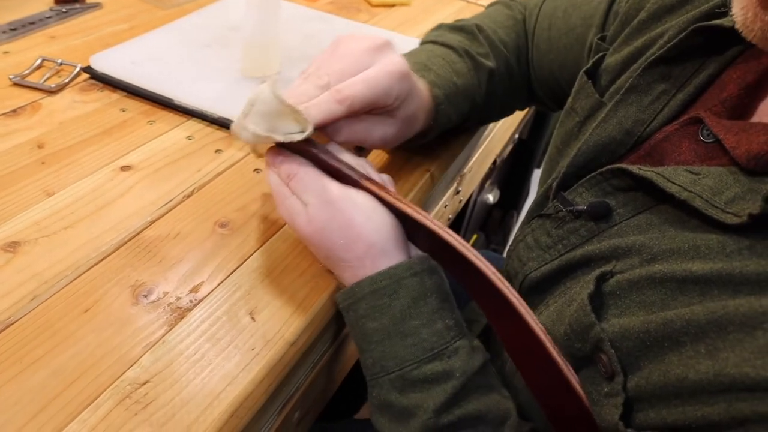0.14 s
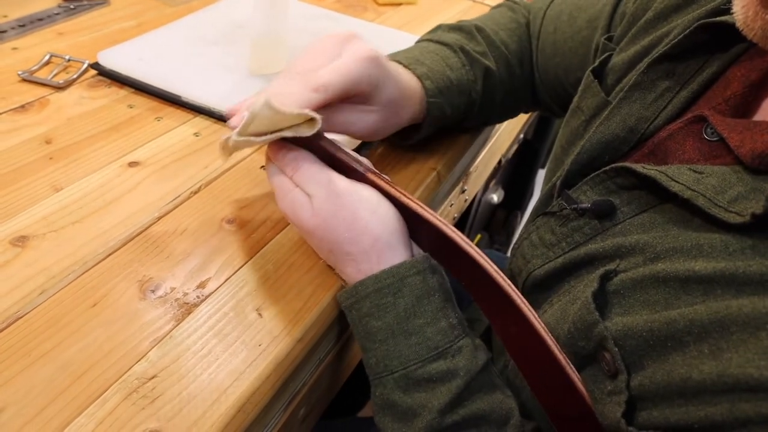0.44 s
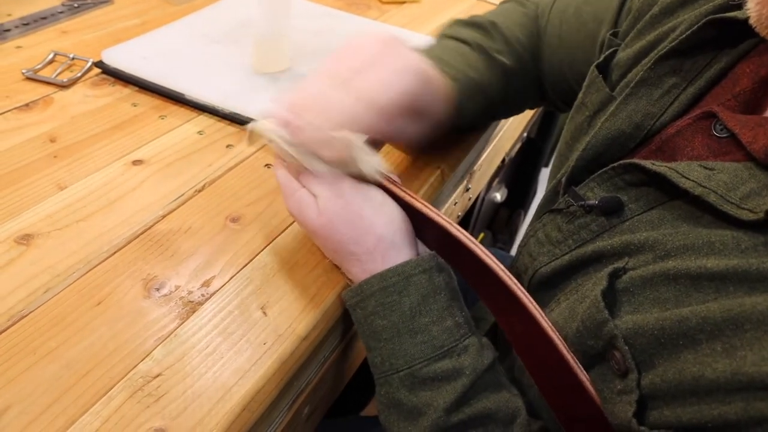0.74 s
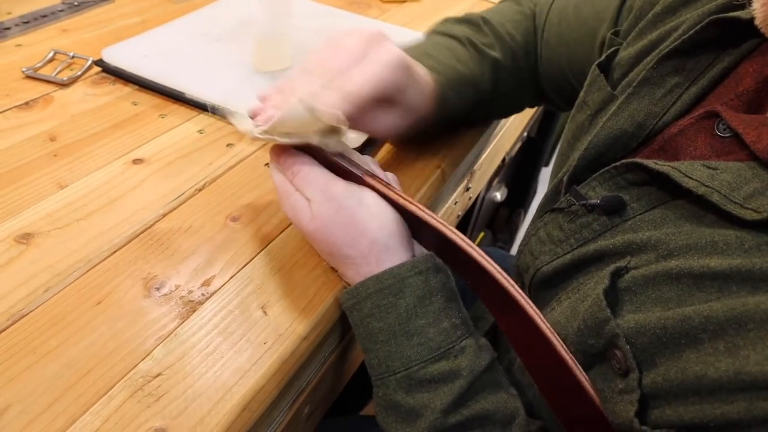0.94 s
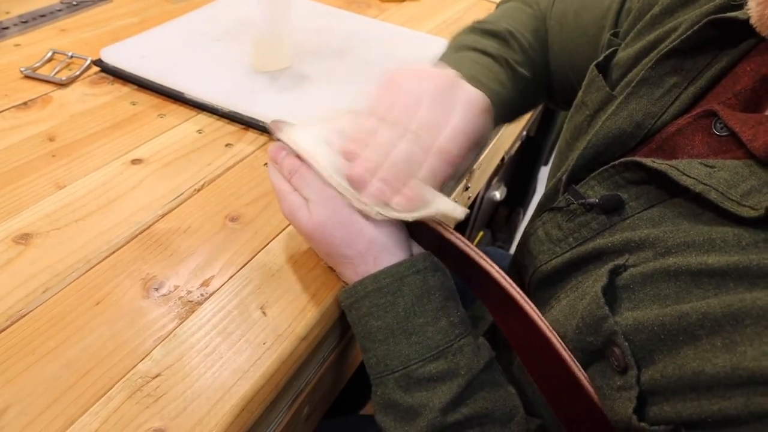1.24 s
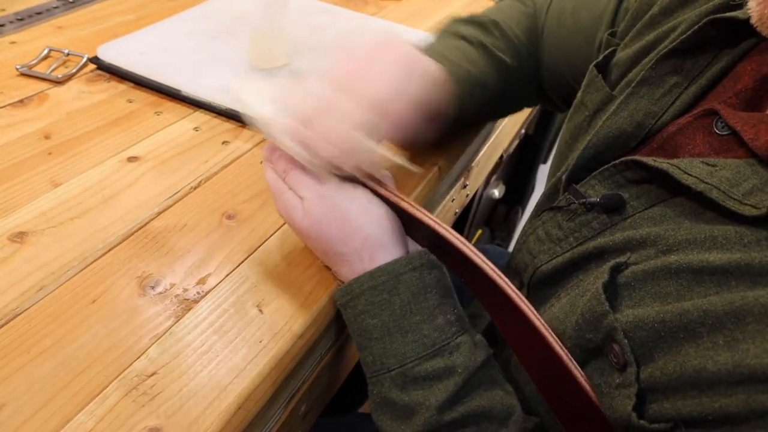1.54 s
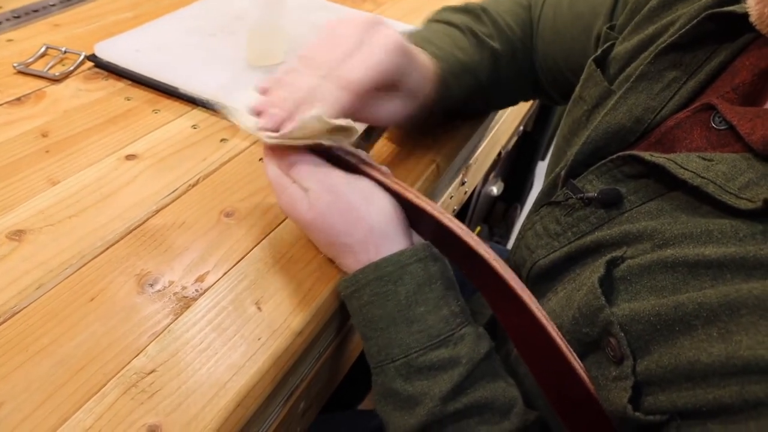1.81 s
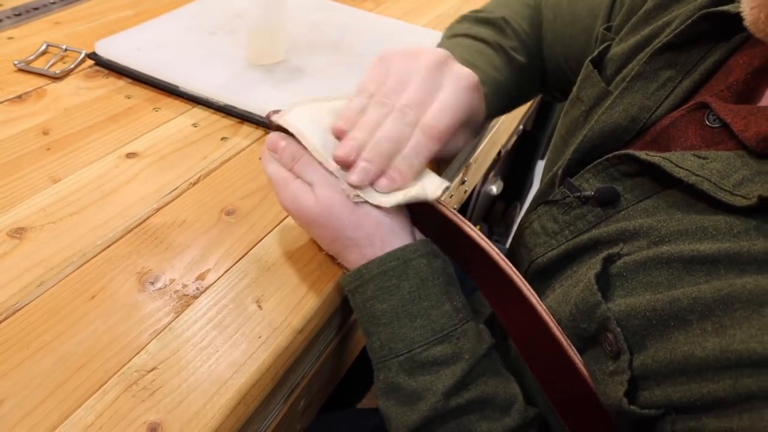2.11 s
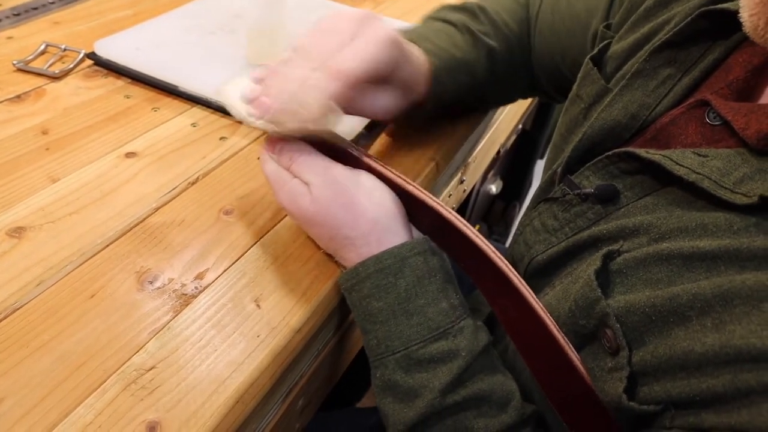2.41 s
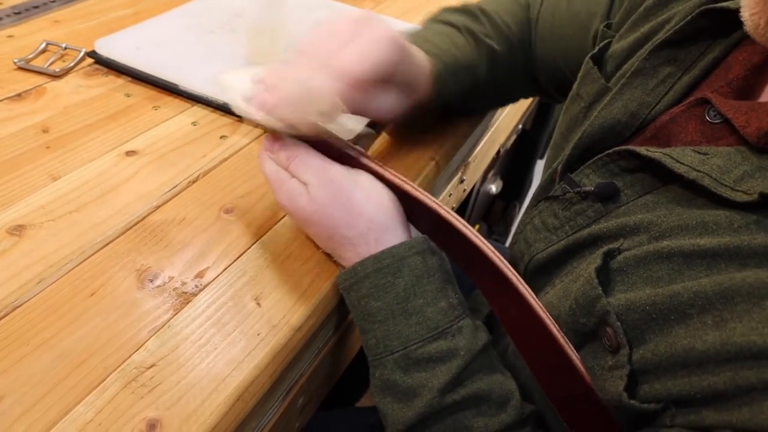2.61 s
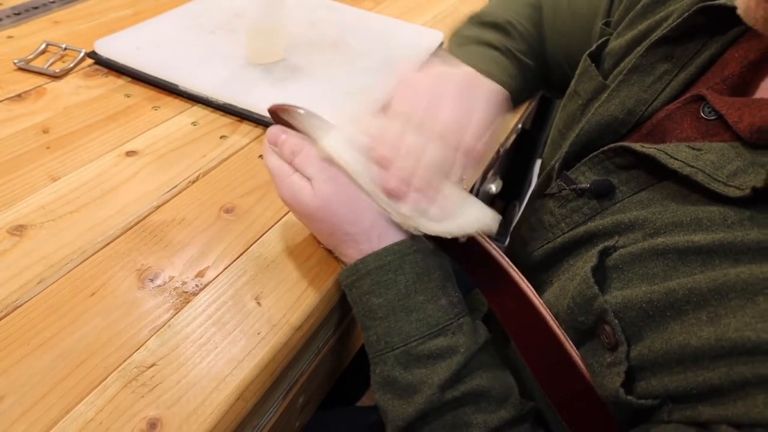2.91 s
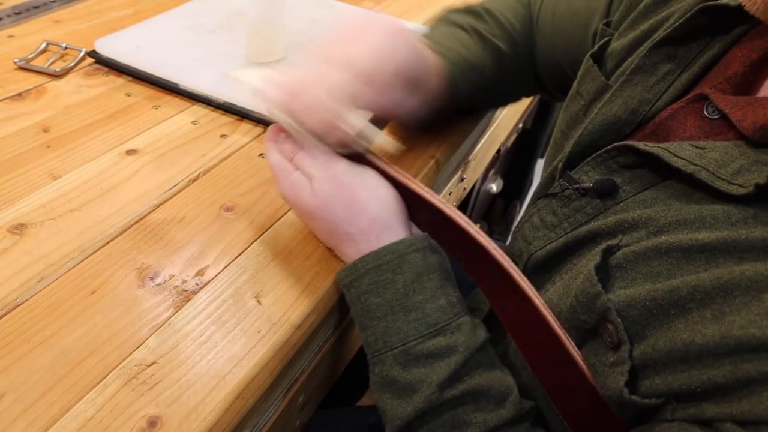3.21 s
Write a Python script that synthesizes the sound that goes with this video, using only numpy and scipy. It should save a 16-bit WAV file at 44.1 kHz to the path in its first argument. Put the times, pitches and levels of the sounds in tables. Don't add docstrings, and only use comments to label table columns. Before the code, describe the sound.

Brisk dry cloth rubbing on leather, heard close, after a short rustling regrip with a snap.

```python
import sys
import numpy as np
from scipy import signal
from scipy.fft import rfft, irfft
from scipy.io import wavfile
from scipy.ndimage import uniform_filter1d

SR = 44100
rng = np.random.default_rng(int(sys.argv[2]) if len(sys.argv) > 2 else 0)


def nominal_scale(level):
    x = np.asarray(level, float) / 20
    return 10 ** x


def unload_wav(signal):
    wavfile.write(
        sys.argv[1],
        SR,
        np.round(np.clip(np.atleast_2d(signal).T, -1, 1) * 32767).astype(np.int16),
    )


N = 147735
T_S = np.arange(N) / SR

# frequency in Hz, level in dB per Hz.
FLOOR_SPECTRUM = [(15, -30), (60, -6), (256, -2), (560, -16), (1190, -29), (2550, -6), (6920, -42),
                  (16000, -39)]

# centre in seconds, half width in seconds, level in dB.
SCUFFS = [
    (.37, 0.12, -45.5),
    (0.5, 0.0081, -40),
    (0.839, 0.0072, -30),
    (1.084, 0.02, -31.5),
    (1.31, 0.051, -37),
    (1.718, 0.0064, -33.5),
    (1.931, 0.04, -34),
    (2.179, 0.0045, -29),
    (2.32, 0.034, -33.5),
]
# frequency in Hz, level in dB per Hz.
SCUFF_SPECTRUM = [(120, -5), (250, 1.5), (550, 3.5), (900, 2), (1600, -32), (4000, -60)]
# centre in seconds, level in dB, frequency in Hz.
SQUEAKS = [
    (.747, -43, 4070),
]

# frequency in Hz, level in dB per Hz.
RUB_SPECTRUM = [(15, -40), (30, -8.5), (70, -2), (200, -3.5), (450, -4.5), (800, -13), (1600, -12.5),
                (4000, -40)]
# time in seconds, rub level in dB.
ARM_EFFORT = [(0, -41.5), (.12, -39.5), (.2, -55), (.3, -50.5), (.5, -42), (1.5, -42.5), (1.9, -40),
              (2.35, -40), (2.6, -39.5), (3.35, -42.5)]
# centre in seconds, level in dB, frequency in Hz.
JOLTS = [(0.074, -36.5, 222), (0.116, -38, 253), (0.172, -36.5, 113), (0.501, -39, 210), (0.621, -49, 95),
         (.82, -44, 65), (.865, -36, 65), (1.085, -36, 86.0), (1.301, -36, 107), (1.523, -36, 86.0),
         (1.56, -37, 171), (1.737, -38, 109), (1.755, -37, 190), (1.777, -32, 103), (1.818, -33, 90),
         (1.862, -42, 216), (1.876, -44, 80), (1.999, -35.5, 175), (1.965, -29, 139), (2.023, -33, 98),
         (2.069, -30.5, 86.0), (2.196, -31, 113), (2.235, -38, 85.6), (2.302, -30, 98.3), (2.374, -37, 90),
         (2.491, -36, 79.6), (2.589, -33.5, 66), (2.725, -36, 248.0), (2.775, -33.5, 75.6),
         (2.971, -33.5, 151), (2.992, -26, 89), (2.996, -32, 186), (3.13, -35.5, 157), (3.185, -31, 52.3),
         (3.319, -34, 70.6)]

# start in seconds, peak in dB, frequency in Hz.
PATS = [
    (.0548, -27.5, 205),
    (0.0624, -26.5, 1100),
    (0.071, -25.5, 435),
    (1.296, -21, 574),
    (1.905, -20.5, 750),
    (2.167, -30, 635),
]
# start in seconds, peak in dB, frequency in Hz.
TICKS = [
    (.089, -27, 9000),
    (.284, -33, 5000),
    (0.323, -25, 2500),
    (.3235, -26, 12000),
    (.757, -18, 6000),
    (1.203, -26, 6000),
    (1.464, -7, 5000),
    (1.694, -16, 1220),
]
# frequency in Hz, level in dB, T60 in seconds.
SNAP_MODES = [(2850, 5, 0.0017), (6000, -2.5, 0.008), (8400, 3, 0.0034), (10000, -2, 0.0023)]

# centre in seconds, level in dB, thread rate in Hz, sag in Hz per ms.
ZIPS = [(.652, -35.5, 1612, -19), (.668, -36, 760, -16), (0.829, -34, 1410, -5.5), (1.06, -33, 1430, 18.5),
        (1.158, -33, 1250, 1.5), (1.372, -29.5, 1230, 8.5), (1.487, -35, 1270, 6), (1.593, -30, 1196, 14),
        (1.703, -31, 1250, 7), (1.92, -31.5, 770, 9.5), (2.332, -38, 1310, 12), (2.536, -39, 1326, 14),
        (2.737, -26, 1330, 17), (2.756, -31, 820, 31), (2.815, -30, 1410, 4.5), (2.935, -24, 1620, 19.5),
        (2.938, -23, 3200, 26.5), (2.952, -22.5, 1020, 33.5), (3.003, -23, 3500, 29),
        (3.011, -26.5, 3250, 14), (3.019, -25, 1600, -10.5), (3.146, -23.5, 1480, 11.5),
        (3.162, -31.5, 1200, 18.5), (3.229, -29, 1570, -2.5), (3.33, -33.5, 1666, 1.5)]

# start in seconds, length in seconds, rasp level in dB, surge level at the tip in dB.
STROKES = [(0.494, 0.12, -28, -32.5), (0.637, 0.093, -27.5, -32), (0.762, 0.088, -24.5, -25.5),
           (0.873, 0.093, -25, -29), (0.99, 0.086, -23.0, -32.5), (1.104, 0.088, -25.5, -31),
           (1.211, 0.083, -24.5, -39), (1.316, 0.093, -24, -31.5), (1.431, 0.083, -24.5, -39),
           (1.542, 0.082, -25.5, -27.5), (1.65, 0.076, -24.0, -29), (1.761, 0.073, -26.5, -24.5),
           (1.858, 0.075, -24.5, -43), (1.96, 0.076, -25, -28.5), (2.065, 0.075, -25, -27.5),
           (2.163, 0.085, -24, -35), (2.275, 0.08, -24, -31), (2.378, 0.082, -24.5, -30.5),
           (2.481, 0.079, -24.5, -28.0), (2.587, 0.08, -26.0, -27), (2.681, 0.082, -24.0, -24),
           (2.791, 0.077, -26, -22), (2.884, 0.08, -22.5, -22), (2.991, 0.083, -25.5, -19.5),
           (3.089, 0.079, -23.0, -22.5), (3.19, 0.088, -25.5, -24), (3.299, 0.09, -21.5, -29)]
# start in seconds, length in seconds, level in dB, slope in dB.
SHUFFLES = [
    (-.03, 0.067, -24, -13),
    (0.055, 0.025, -29, 6),
    (0.087, 0.017, -38, -8),
    (0.115, 0.0074, -24.5, -17),
    (0.118, 0.094, -51, 3),
    (0.213, 0.15, -47.5, 9),
    (0.319, 0.069, -38, 7),
    (0.382, 0.05, -36.5, 10),
    (0.434, 0.054, -42, 22),
]
# frequency in Hz, level in dB per Hz.
RASP_SPECTRUM = [(180, -67), (300, -44), (425, -19.5), (1140, 0), (1580, -3.5), (3290, -2.5), (5430, 1.5),
                 (9550, -6.5), (16000, -25)]
# frequency in Hz, level in dB per Hz.
TIP_SPECTRUM = [(180, -51), (300, -16), (565, -19), (1230, -5.5), (2140, -5.5), (3520, 0), (4020, -4.5),
                (10400, -10.5), (16000, -34)]


def evened(x):
    return x / np.sqrt(np.mean(x ** 2) + 1e-20)


def bell(t, wide):
    return np.exp(-.5 * (t / wide) ** 2)


def coloured(x, points):
    f, db = np.transpose(points)
    hz = np.fft.rfftfreq(len(x), 1 / SR)
    gain = nominal_scale(np.interp(np.log(hz + 1), np.log(f + 1), db))
    return evened(irfft(rfft(x) * gain, len(x)))


def resonate(x, hz, width_hz):
    turn = np.exp(2j * np.pi * np.cumsum(hz * np.ones(len(x))) / SR)
    r = np.exp(-np.pi * width_hz / SR)
    return 2 * (turn * signal.lfilter([1 - r], [1, -r], x / turn)).real


def add(mix, start_s, sound):
    part = mix[max(round(start_s * SR), 0):][:len(sound)]
    part += sound[:len(part)]


def drift(seconds):
    size = round(seconds * SR)
    return evened(uniform_filter1d(uniform_filter1d(rng.standard_normal(N), size), size))


def patchy(x):
    patch_db = 1.6
    z = signal.stft(x, nperseg=256, noverlap=192)[2]
    field = uniform_filter1d(rng.standard_normal(z.shape[::-1]), size=10, axis=0)
    field = uniform_filter1d(field, size=4, axis=1)
    z = z * nominal_scale(patch_db * evened(field).T)
    return evened(signal.istft(z, nperseg=256, noverlap=192)[1][:N])


def fibres():
    slips_per_s, spread_db = 30000, 0.77
    size = nominal_scale(spread_db * np.minimum(rng.exponential(1, N), 5))
    return size * rng.standard_normal(N) * (rng.random(N) < slips_per_s / SR)


def steady_floor():
    return nominal_scale(-50.5) * coloured(rng.standard_normal(N), FLOOR_SPECTRUM)


def workshop(x):
    wet_db, t60_s, dull_hz, gap_s = -20.5, 0.25, 3950, .003
    t = np.arange(SR // 2) / SR
    tail = signal.lfilter([1], [1, -np.exp(-2 * np.pi * dull_hz / SR)], rng.standard_normal(len(t)))
    tail = tail * nominal_scale(-60 * t / t60_s) * (t > gap_s)
    return nominal_scale(wet_db) * signal.fftconvolve(x, tail / np.linalg.norm(tail))[:N]


def sleeve():
    effort = sum(nominal_scale(db) * bell(T_S - s, wide_s) for s, wide_s, db in SCUFFS)
    out = coloured(fibres(), SCUFF_SPECTRUM) * nominal_scale(drift(0.0016)) * effort

    noise = rng.standard_normal(N)
    for s, db, hz in SQUEAKS:
        out += nominal_scale(db) * bell(T_S - s, 0.013) * evened(resonate(noise, hz, 90))

    thud_s, thud_db, thud_hz, sag_hz_per_s = 0.145, -35, 130, 420
    t = np.arange(0, .09, 1 / SR)
    swell = np.sin(np.pi * (t / 0.095) ** 0.91)
    add(out, thud_s, nominal_scale(thud_db) * swell * np.sin(2 * np.pi * (thud_hz - sag_hz_per_s * t / 2) * t))
    return out


def jacket():
    cycles, sag, least_s = 0.5, 0.078, 0.0095
    s, db = np.transpose(ARM_EFFORT)
    rub_db = np.interp(T_S, s, db) + 0.5 + 3.37 * drift(0.015)
    out = coloured(rng.standard_normal(N), RUB_SPECTRUM) * nominal_scale(rub_db)

    t = np.arange(-.06, .06, 1 / SR)
    for (s, db, hz), turn in zip(JOLTS, rng.random(len(JOLTS))):
        wide_s = max(cycles / hz, least_s)
        wave = np.sin(2 * np.pi * (turn + hz * t * (1 - sag * t / wide_s)))
        add(out, s - .06, nominal_scale(db + 1.0) * bell(t, wide_s) * wave)
    return out


def ring(t, hz, db, t60_s):
    return nominal_scale(db - 60 * t / t60_s) * np.sin(2 * np.pi * hz * t)


def taps():
    out, t = np.zeros(N), np.arange(3000) / SR
    for s, db, hz in PATS:
        add(out, s, ring(t, hz, db + 8.5, 0.011) * np.minimum(t / 0.00095, 1))
    for s, db, hz in TICKS:
        add(out, s, ring(t, hz, db, 9 / hz))

    snap_s, rise_s, end_s = .11274, .00012, .00075
    snap = sum(ring(t, *mode) for mode in SNAP_MODES)
    add(out, snap_s, snap * np.minimum(t / rise_s, 1) * np.exp(-(t / end_s) ** 3))
    return out


def weave():
    zip_s, even_share, width_hz = 0.014, .45, 200
    rougher, brief_sag_hz_per_ms = 0.79, 31
    out, t = np.zeros(N), np.arange(-.05, .05, 1 / SR)
    for (s, db, hz, sag), noise in zip(ZIPS, rng.standard_normal((len(ZIPS), len(t)))):
        rate_hz = np.maximum(hz - 1e3 * sag * t, 200)
        jitter = 1 + 0.065 * evened(uniform_filter1d(noise, size=120))
        even = even_share * np.sqrt(2) * np.sin(2 * np.pi * np.cumsum(rate_hz * jitter) / SR)
        wide_hz = width_hz * nominal_scale(rougher * (db + 25.0))
        ragged = evened(resonate(resonate(noise, rate_hz, wide_hz), rate_hz, wide_hz))
        swell = bell(t * (1 + abs(sag) / brief_sag_hz_per_ms), zip_s)
        add(out, s - .05, nominal_scale(db) * swell * (even + ragged))
    return out


def shuffle(start_s, length_s, db, slope_db):
    rise_s, fall_s = 0.0071, 0.03
    first_s = max(start_s - .03, 0)
    t = first_s - start_s + np.arange(0, length_s + .07, 1 / SR)
    up = np.clip(t / rise_s + 0.49, 0, 1)
    down = np.clip((length_s - t) / fall_s + 0.34, 0, 1)
    tilt_db = slope_db * (np.clip(t / length_s, 0, 1) - .5)
    return first_s, (np.sin(up * np.pi / 2) * np.sin(down * np.pi / 2)) ** 2 * nominal_scale(db + tilt_db)


def grip(start_s, length_s, db, slope_db, rise_s, fall_s):
    t = np.arange(-.015, length_s + .015, 1 / SR)
    edges_db = -8 * (np.exp(-t / rise_s) + np.exp((t - length_s) / fall_s))
    tilt_db = slope_db * (np.clip(t / length_s, 0, 1) - .5)
    return start_s - .015, nominal_scale(db + edges_db + tilt_db)


def cloth():
    out_tip_s, back_tip_s, tip_wide_s, tip_db = 0.022, 0.015, 0.01, 3.5
    speed, surge, near_tip = np.zeros((3, N))
    t = np.arange(-.05, .05, 1 / SR)
    for k, (start_s, length_s, db, surge_db) in enumerate(STROKES):
        if k % 2:
            pass_speed = grip(start_s, length_s, db, -5.5, .004, .0045)
            tip_s = start_s + back_tip_s
        else:
            pass_speed = grip(start_s, length_s, db, 0, .0045, .0045)
            tip_s = start_s + length_s - out_tip_s
        add(speed, *pass_speed)
        add(near_tip, tip_s - .05, np.hanning(SR // 10))
        add(surge, tip_s - .05, nominal_scale(surge_db + tip_db) * bell(t, tip_wide_s))
    for row in SHUFFLES:
        add(speed, *shuffle(*row))

    fold_hz, fold_width_hz, fold_db, fold_sag = 5830, 1260, -16.5, 0.18
    rasp = patchy(coloured(fibres(), RASP_SPECTRUM))
    hz = fold_hz * (1 + 0.042 * drift(0.011) - fold_sag * near_tip)
    hollow = evened(resonate(rasp, hz, fold_width_hz))
    rasp = evened(rasp + nominal_scale(fold_db + 5.7 * drift(0.036)) * hollow)
    rasp = rasp * speed * nominal_scale(-0.38 + 1.17 * drift(0.003))
    tip = patchy(coloured(fibres(), TIP_SPECTRUM)) * surge * nominal_scale(0.48 * drift(0.0031))
    return rasp + tip


def scene():
    near = cloth() + weave() + taps()
    return (near + workshop(near) + jacket() + steady_floor() + sleeve())[None]


def band_limit(x):
    return signal.sosfilt(signal.butter(12, 15930, fs=SR, output="sos"), x)


def record(dry):
    ceiling, top_hz = .97, 15950
    low_pass = signal.firwin(401, top_hz, window=("kaiser", 8), fs=SR)
    mix = signal.oaconvolve(np.clip(dry, -ceiling, ceiling), low_pass[None], "same")
    return band_limit(mix)


dry = scene()
out = record(dry)
unload_wav(out)
```